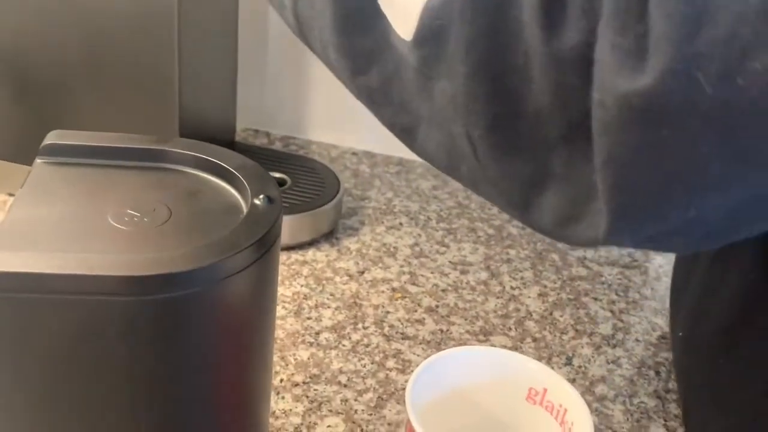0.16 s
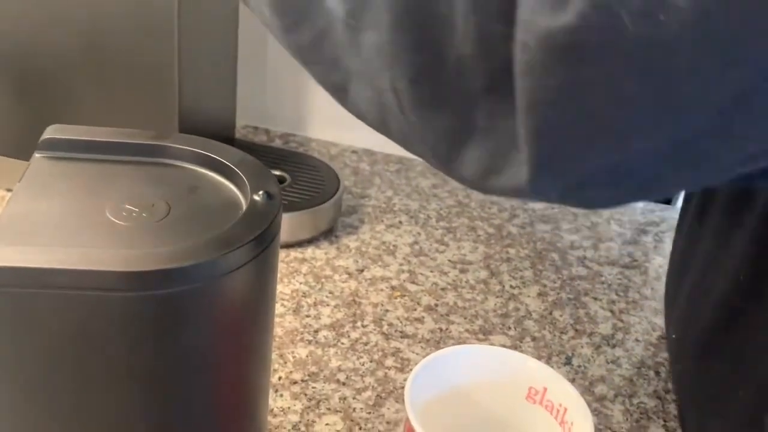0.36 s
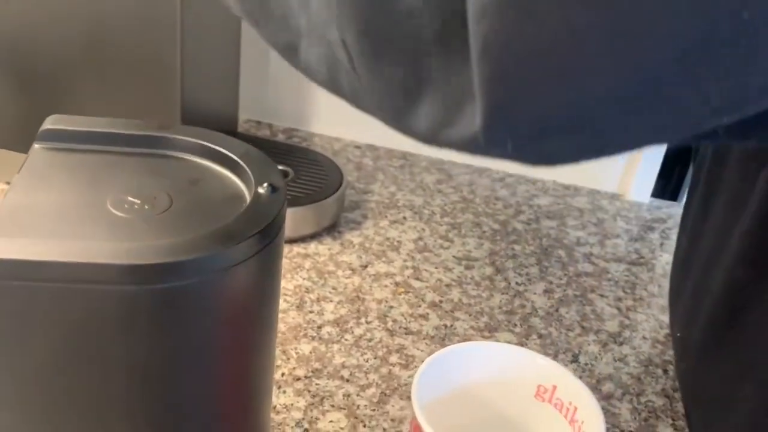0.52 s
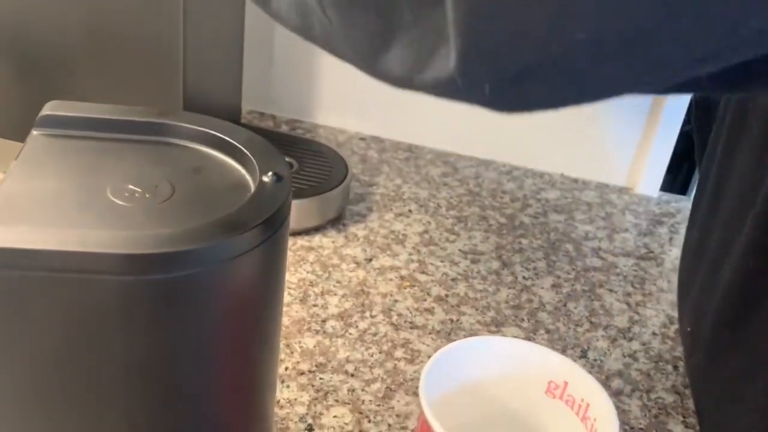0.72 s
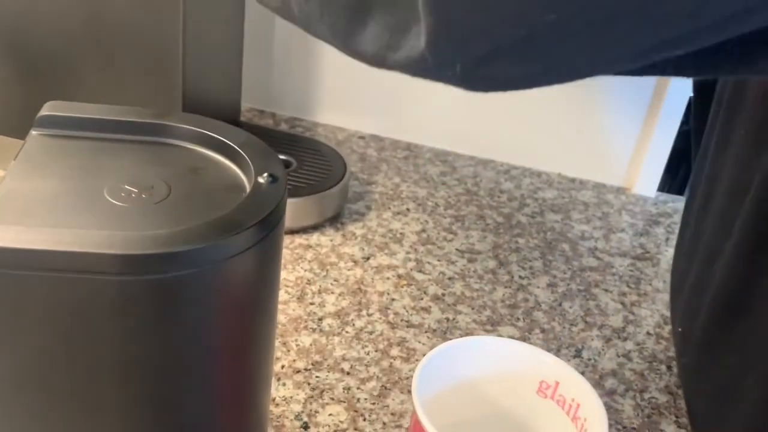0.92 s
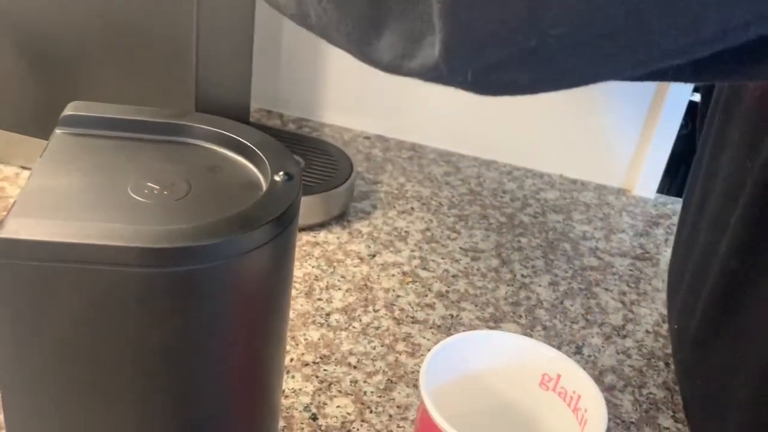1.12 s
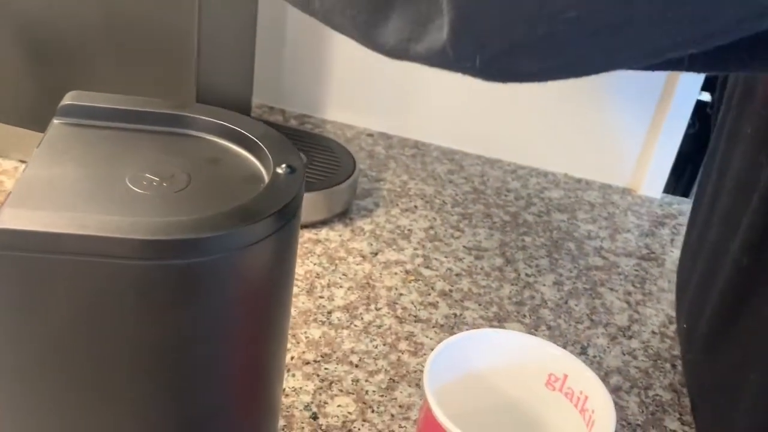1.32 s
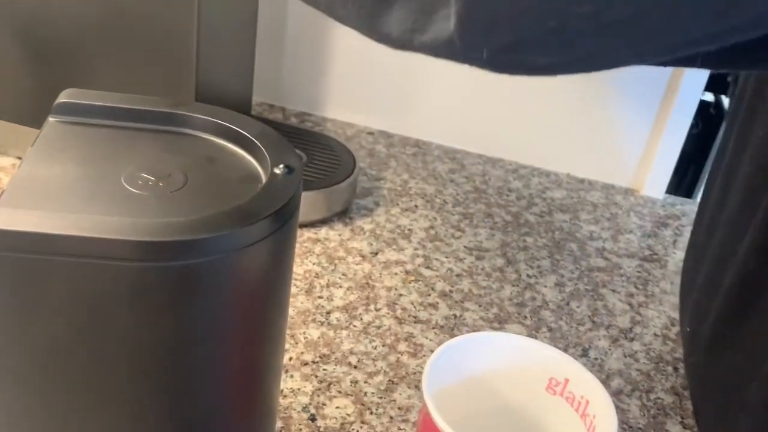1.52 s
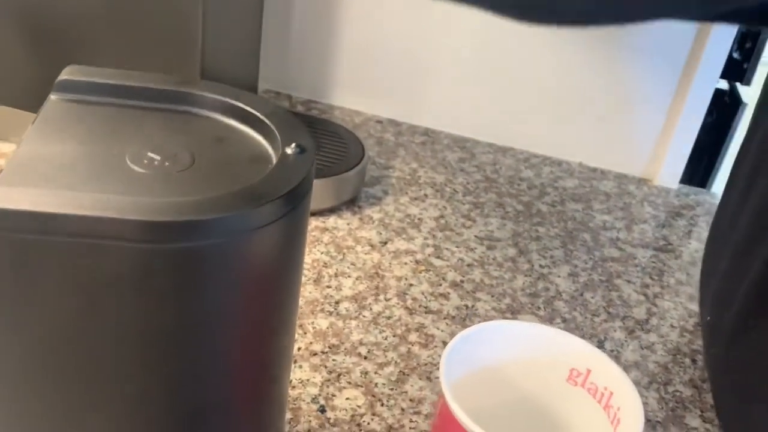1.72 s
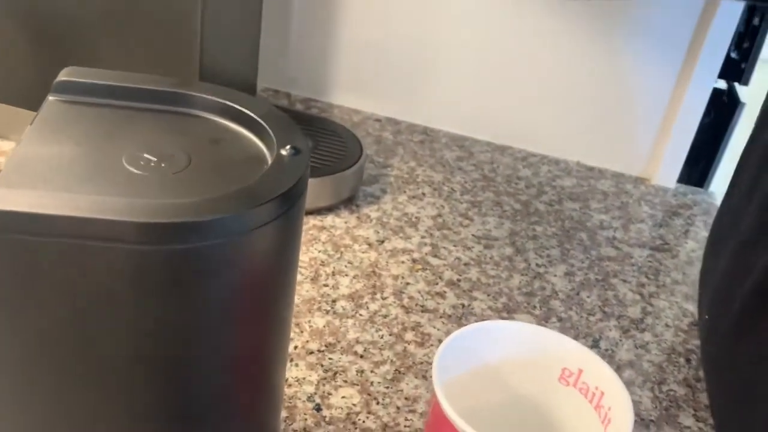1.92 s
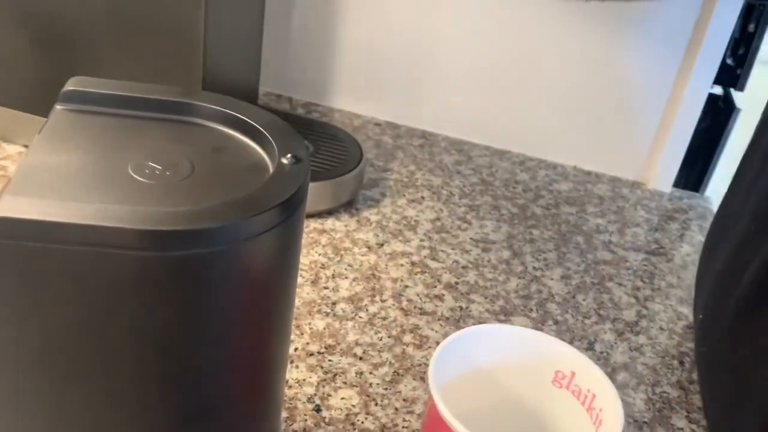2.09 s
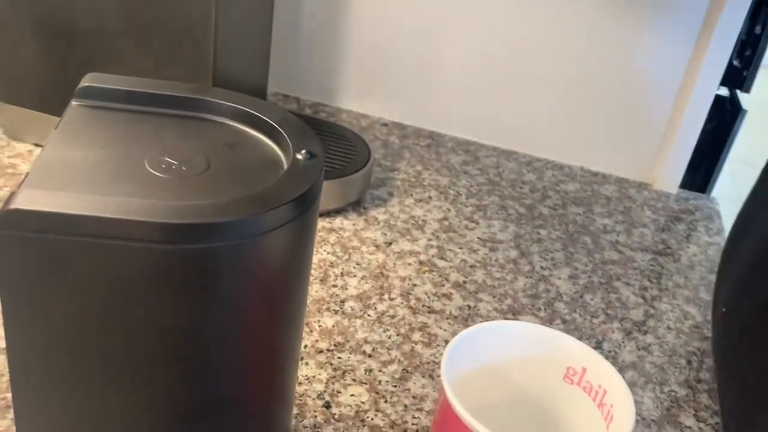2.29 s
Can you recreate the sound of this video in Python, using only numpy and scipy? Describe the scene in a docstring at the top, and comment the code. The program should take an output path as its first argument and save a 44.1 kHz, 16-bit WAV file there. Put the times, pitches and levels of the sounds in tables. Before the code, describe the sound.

A hollow plastic water tank is bumped and seated on a coffee maker with loud low knocks and a scrape, then light drips and two small clacks, close stereo microphone in a quiet, slightly humming kitchen.

```python
"""Close bumps, scrapes and clacks of a plastic water reservoir handled at a coffee maker in a kitchen.
A little water trickles and drips into it, and two more clacks come late in the scene.
Damped swings make the bumps, ringing wall modes and noise cracks the clacks, sliding resonances the rubs,
random grains the scrape and trickle, bubble tones in noise the drips.
A faint mains hum and air noise lie under the short ring of the room."""
import sys
import numpy as np
from scipy import signal
from scipy.fft import rfft, irfft
from scipy.io import wavfile
from scipy.ndimage import uniform_filter1d

SR = 44100
rng = np.random.default_rng(int(sys.argv[2]) if len(sys.argv) > 2 else 0)


def to_wav(s):
    """Save 16-bit WAV."""
    ch = np.atleast_2d(s).T  # columns
    pcm = np.round(np.clip(ch, -1, 1) * 32767)  # PCM
    wavfile.write(sys.argv[1], SR, pcm.astype(np.int16))


N = 103635  # length [samples]

# All levels are set ahead of the room and the microphone.
LEFT_LEAD_S = 0.000255  # sound reaches the left this much earlier
RAGGED_HZ, RAGGED_DB = 400, 3  # break-up of bursts and rubs: random points per second, half the reach
GRAIN_SPREAD_DB = 3  # unevenness of grains and droplets


def bump(db, hz, swell):
    """A soft push: the heavily damped tank swings a few cycles, strongest at twice the swell time."""
    t = ear_times()
    u = t / (2 * swell)
    envelope = (u * np.exp(1 - u)) ** 2
    return leftward(amp(db) * envelope * np.sin(2 * np.pi * hz * t), 1)


def clack(ring_db, bright_hz, crack_db, tilt_db, decay):
    """A short ragged crack, coloured unevenly by the spot struck; the walls ring with a set brightness."""
    # modes of the tank walls: (pitch [Hz], level [dB], time to fall 60 dB [s])
    modes = [(216, 1, 0.17), (307.5, -8, 0.18), (395.3, -2.5, .09), (532.2, -9, 0.15), (718.3, -12, 0.23),
             (765, -14.5, 0.085), (886, -17, 0.089), (1260.6, 4, 0.052), (1495, -3, 0.053),
             (2260, -13.5, 0.059), (2550, -9, 0.045), (3300, -1, 0.046), (10000, 10.5, 0.12),
             (15200, 9.5, 0.094)]
    # spectrum of the crack: (frequency [Hz], level [dB])
    crack_colour = [(300, -24), (700, 19), (1200, 18), (2000, 8.5), (3100, 8), (5000, -4.5), (6800, -2),
                    (10500, -10), (15500, -19)]
    rolloff_order, rise_share = 3.7, 0.69  # rise as a share of the decay
    uneven_hz, uneven_db = 180, 2.5  # spacing of the random colour points, half their reach
    t = ear_times()

    ring = np.zeros(t.shape)
    for k, (hz, db, t60) in enumerate(modes):
        brightness = 1 / (1 + (hz / bright_hz) ** rolloff_order)
        ring += (-1) ** k * amp(db - 60 * t / t60) * wall_mode(t, hz) * brightness

    spots = np.arange(0, SR / 2, uneven_hz)
    uneven = uneven_db * rng.uniform(-2, 2, len(spots))

    def crack_db_at(hz):
        tilt = tilt_db * np.log2(np.maximum(hz, 700) / 3500)  # level below 700 Hz
        return read(crack_colour, hz) + np.interp(hz, spots, uneven) + tilt

    crack = hiss(t, crack_db_at) * burst(t, rise_share * decay, decay)
    return amp(ring_db) * leftward(ring, 0.8) + amp(crack_db) * crack


def wall_mode(t, hz):
    """One mode of the held tank: its pitch wanders, and low modes take longer to build up."""
    rise_s, rise_cycles, blur = 0.0021, 0.99, 0.01  # blur: strength of the wander, as a share of the pitch
    wander = np.cumsum(rng.standard_normal(t.shape[1])) * np.sqrt(2 * np.pi * blur * hz / SR)
    build_up = 1 - np.exp(-(t / (rise_s + rise_cycles / hz)) ** 2)
    return np.sin(2 * np.pi * hz * t + wander) * build_up


def rub(length, db, pitch_hz, octaves):
    """A chattering resonance that swells, fades and sags in pitch, as of plastic sliding on plastic."""
    sag = 0.7  # share of the pitch lost over the rub, per octave of width
    t = ear_times(size=8192)
    swell = np.sin(np.pi * np.minimum(t / length, 1)) * ragged(t, RAGGED_HZ, RAGGED_DB)
    return amp(db) * swell * whistle(t, pitch_hz, octaves, -sag * octaves / length)


def scrape():
    """The tank scrapes against the machine as it seats: a patter of tiny contacts, mostly low."""
    # level curve: (time [s], level [dB])
    level = [(.2, -40.5), (.245, -40), (.31, -47.5), (.38, -42), (.5, -54.5), (.62, -63.5), (.75, -66.5)]
    # spectrum: (frequency [Hz], level [dB])
    spectrum = [(60, -13.5), (220, 3), (400, -2.5), (1000, -10), (3000, -25.5), (15000, -58)]
    return grains(level, spectrum)


def drip(db, pitch_hz):
    """A tiny bubble rings inside a puff of splash; each drip sags in pitch at its own rate."""
    rise_s, decay_s = 0.0021, 0.0067
    max_sag = 12  # share of the pitch per second
    bubble_db, splash_db, splash_octaves = -8.5, -8.5, 0.44
    t = ear_times(size=2048)
    glide = -max_sag * rng.random()
    bubble = np.sin(2 * np.pi * pitch_hz * t * (1 + glide * t / 2))
    splash = whistle(t, pitch_hz, splash_octaves, glide)
    return amp(db) * burst(t, rise_s, decay_s) * (amp(bubble_db) * bubble + amp(splash_db) * splash)


def spatter():
    """Fine droplets at random moments and pitches, as rows for drip: time [s], level [dB], pitch [Hz]."""
    # centre level of the droplets: (time [s], level [dB])
    curve = [(1.281, -66), (1.384, -56.5), (1.44, -72), (1.619, -72), (1.758, -75.5)]
    drops_per_s, low_hz, high_hz = 620, 2412, 15700
    times, levels = np.transpose(curve)
    span = times[-1] - times[0]
    when, size, pitch = rng.random((int(drops_per_s * span), 3)).T
    s = times[0] + when * span
    db = np.interp(s, times, levels) + 2 * GRAIN_SPREAD_DB * (2 * size - 1)
    return zip(s, db, low_hz * (high_hz / low_hz) ** pitch)


def trickle():
    """A faint wash of water moving in the tank: a patter of grains that comes and goes."""
    # level curve: (time [s], level [dB])
    level = [(.7, -71.5), (1.0, -59), (1.17, -70.5), (1.45, -61.5), (1.8, -71.5)]
    # spectrum: (frequency [Hz], level [dB])
    spectrum = [(100, -9.5), (280, 14), (550, -6.5), (1300, -5.5), (15000, -61)]
    return grains(level, spectrum)


def kitchen(x):
    """The room's tail: dense reflections, each band dying at its own speed."""
    # decay of the room: (frequency [Hz], time to fall 60 dB [s])
    decay = [(100, 0.32), (400, 0.48), (15000, 0.087)]
    # spectrum of the tail: (frequency [Hz], level [dB])
    spectrum = [(60, -20.5), (250, -10), (500, -11.5), (3000, -10.5), (15000, -11.5)]
    hz, t, bands = signal.stft(rng.standard_normal((2, SR)), SR, nperseg=256)
    t60 = read(decay, hz)[:, None]
    equal_energy = np.sqrt(2 * np.log(1000) / (t60 * SR))
    bands = bands * amp(-60 * t / t60) * equal_energy
    tail = colour(signal.istft(bands, SR, nperseg=256)[1], lambda hz: read(spectrum, hz))
    tail = tail[:, :SR * 3 // 4]
    tail = tail * np.minimum(np.arange(tail.shape[1]) / SR / 0.0027, 1)  # fades in over 2.7 ms
    return signal.fftconvolve(x, tail, axes=1)[:, :N]


def background():
    """Mains hum of an appliance, a steady sine, and still room air, coloured noise."""
    # spectrum of the air: (frequency [Hz], level [dB])
    air_colour = [(20, -21.5), (60, 2.5), (250, -2.5), (450, -11.5), (2000, -31), (16000, -39.5)]
    hum_hz, hum_db, air_db = 120.1, -61, -65  # second harmonic of the mains; rms levels
    t = ear_times(size=N)
    hum = np.sqrt(2) * np.sin(2 * np.pi * hum_hz * t)
    air = hiss(t, lambda hz: read(air_colour, hz))
    return amp(hum_db) * hum + amp(air_db) * air


def grains(level, spectrum):
    """A patter of tiny contacts of uneven size, in clumps, under a level curve."""
    grains_per_s, clump_hz, clump_db = 4000, 130, 2.2
    size = amp(GRAIN_SPREAD_DB * np.minimum(rng.exponential(1, (2, N)), 4))
    size = size * rng.choice([-1, 1], (2, N))
    struck = rng.random((2, N)) < grains_per_s / SR
    patter = colour(size * struck, lambda hz: read(spectrum, hz))
    swell = amp(np.interp(np.arange(N) / SR, *np.transpose(level), left=-120, right=-120))
    clumps = ragged(ear_times(size=N), clump_hz, clump_db)
    return unit(patter) * clumps * uniform_filter1d(swell, size=800)


def whistle(t, pitch_hz, octaves, glide):
    """Noise in one resonance, 12 dB down at octaves off pitch, sliding by the share glide each second."""
    def resonance_db(hz):
        offset = np.log2((hz + 1) / pitch_hz) / octaves
        return -20 * np.log10((1 + offset ** 2) ** 2)

    band = hiss(t, resonance_db)
    return (signal.hilbert(band) * np.exp(1j * np.pi * pitch_hz * glide * t ** 2)).real


def burst(t, rise, decay):
    """A quick swell and exponential fall, broken up into tiny bursts."""
    envelope = np.minimum(t / rise, 1) ** 2 * np.exp(-np.maximum(t - rise, 0) / decay)
    return ragged(t, RAGGED_HZ, RAGGED_DB) * envelope


def ragged(t, hz, depth_db):
    """A gain of rms 1 gliding between random levels, hz of them a second, within twice depth_db."""
    steps = t[0] * hz
    levels = rng.uniform(-2, 2, len(steps))
    return unit(amp(depth_db * np.interp(steps, np.arange(len(steps)), levels)))


def hiss(t, db_at):
    """Coloured stereo noise of rms 1."""
    return unit(colour(rng.standard_normal(t.shape), db_at))


def colour(pair, db_at):
    """Filters two unrelated signals by db_at(Hz); their shared part reaches the left first."""
    # likeness of left and right: (frequency [Hz], correlation [0 to 1])
    alike = [(60, 0.4), (290, 1), (1000, 0.18), (15000, 0.043)]
    hz = np.fft.rfftfreq(pair.shape[1], 1 / SR)
    left, other = rfft(pair)
    same = np.clip(read(alike, hz), -1, 1)
    late = np.exp(-2j * np.pi * hz * LEFT_LEAD_S)
    right = same * left * late + np.sqrt(1 - same ** 2) * other
    return irfft(np.array([left, right]) * amp(db_at(hz)), pair.shape[1])


def ear_times(size=16384):
    """Time [s] since a blow at each microphone; the left hears it first."""
    return np.maximum(np.arange(size) / SR - np.array([[0], [LEFT_LEAD_S]]), 0)


def leftward(x, db):
    """The tank stands a little to the left: db up on the left, db down on the right."""
    return x * amp([[db], [-db]])


def amp(db):
    """Decibels to gain."""
    return 10 ** (np.asarray(db) / 20)


def unit(x):
    """Scales to rms 1."""
    return x / np.sqrt(np.mean(x ** 2) + 1e-20)


def read(points, hz):
    """Reads a table on a log-frequency axis."""
    f, value = np.transpose(points)
    return np.interp(np.log(hz + 1), np.log(f + 1), value)


def add(mix, s, sound):
    """Mixes a stereo sound in at time s."""
    part = mix[:, max(round(s * SR), 0):][:, :sound.shape[1]]
    part += sound[:, :part.shape[1]]


def scene():
    """Tank and water close by, their reflections in the kitchen, and the background."""
    # dull bumps of the tank: (time [s], level [dB], pitch [Hz], swell [s])
    bumps = [(0.029, -39, 211.7, 0.004), (.045, -27, 229, 0.0011), (0.2162, -10.5, 394, 0.0013),
             (0.217, -18, 995, 0.0017), (0.218, -16.5, 130.3, 0.0042), (.232, -8, 242, 0.0014),
             (0.293, -26.5, 213, 0.0043), (0.31, -20, 320, 0.00069), (0.338, -25.5, 325, 0.00099),
             (0.518, -8.5, 313, 0.0011), (0.579, -20.5, 209, 0.0012), (0.589, -18, 253, 0.001),
             (0.822, -28.5, 258, 0.0018), (0.985, -44.5, 303.5, 0.0038), (1.207, -45, 264, .002),
             (1.638, -28.5, 335, 0.0025), (1.658, -33, 297, 0.0018), (1.718, -48.5, 81, 0.0073),
             (1.761, -44.5, 131, 0.0072), (1.925, -45, 263, 0.0023), (2.256, -46, 240.5, 0.0023)]
    # hard contacts of plastic, each with its own brightness: (time [s], ring level [dB],
    # ring brightness [Hz], crack level [dB], crack tilt [dB per octave], crack decay [s])
    clacks = [(0.014, -35.5, 1920, -32, 7.5, 0.0082), (.037, -38, 1200, -39, -1, 0.013),
              (.169, -43.5, 2010, -48, -6, 0.0075), (0.2159, -18.5, 1200, -21.5, -3.5, 0.0038),
              (0.3509, -45, 2000, -37, 6, 0.0048), (0.4328, -47, 14550, -26, 12.5, 0.0081),
              (0.515, -35, 1500, -44, -9, 0.0075), (.573, -36, 700, -42.5, -3, 0.0099),
              (0.819, -35, 413, -46, -1, 0.0059), (1.631, -34.5, 3060, -38, 5.5, 0.0067),
              (1.973, -34, 2780, -39, 3.5, 0.0085)]
    # short rubs, faint squeaks and a soft noisy swell into the last clack:
    # (time [s], length [s], level [dB], pitch [Hz], width [octaves])
    rubs = [(0.4, 0.025, -45.5, 2200, 0.67), (0.432, .02, -43, 2350, 0.09), (0.51, .014, -37.5, 1346, 0.61),
            (.97, 0.14, -65.5, 1104, 0.27), (1.205, 0.0489, -58.5, 1150, 0.92),
            (1.603, .028, -55.5, 3700, 0.85), (1.636, 0.0212, -40.5, 1872, .8),
            (1.963, 0.025, -51, 3260, 1.27), (1.997, 0.039, -54, 1250, 0.71)]
    # drops landing in the tank: (time [s], level [dB], pitch [Hz])
    drips = [(1.1403, -57.5, 12000), (1.229, -37.5, 953), (1.2969, -36.5, 5890), (1.339, -37, 10610),
             (1.361, -38.5, 3410), (1.375, -42.5, 10870), (1.38, -40.5, 2897), (1.479, -48, 6820),
             (1.547, -43, 2983), (1.659, -40, 6680), (1.692, -52, 12170)]
    near = scrape() + trickle()
    for source, rows in ((bump, bumps), (clack, clacks), (rub, rubs), (drip, drips), (drip, spatter())):
        for s, *settings in rows:
            add(near, s, source(*settings))
    return near + kitchen(near) + background()


def record(dry):
    """The microphone ports shape the treble into peaks and notches; a low-pass sets the top edge."""
    # response, flat outside the table: (frequency [Hz], level [dB])
    response = [(7400, 6), (8100, -5.5), (8650, -17), (9300, 1), (10000, 7), (11900, 7.5), (13400, -6.5),
                (14200, 4), (15500, 11), (16200, -21.5)]
    edge_hz = 16900
    gain = amp(read(response, np.fft.rfftfreq(2 * N, 1 / SR)))
    heard = irfft(rfft(dry, 2 * N) * gain)[:, :N]
    low_pass = signal.firwin(511, edge_hz, window=("kaiser", 9), fs=SR)
    return signal.oaconvolve(heard, low_pass[None], "same")


dry = scene()
out = record(dry)
to_wav(out)
```